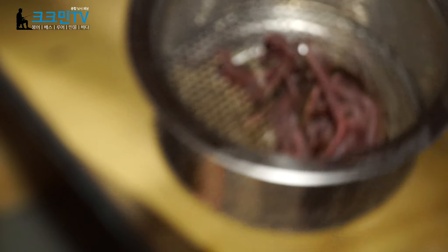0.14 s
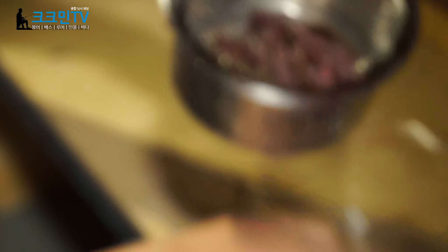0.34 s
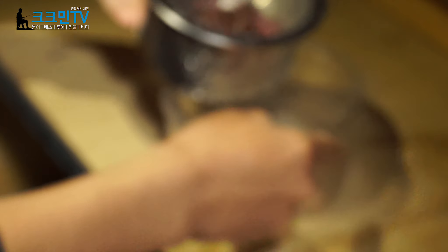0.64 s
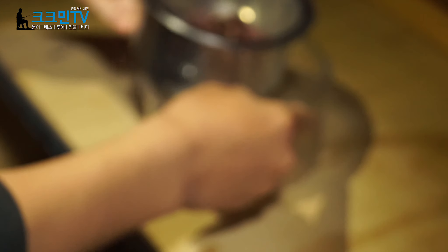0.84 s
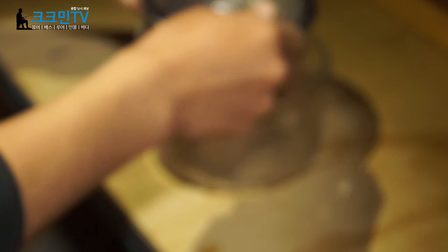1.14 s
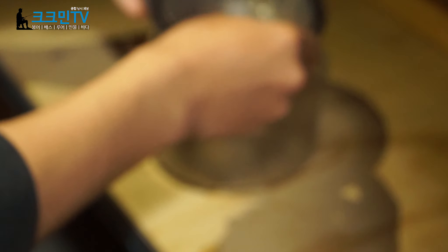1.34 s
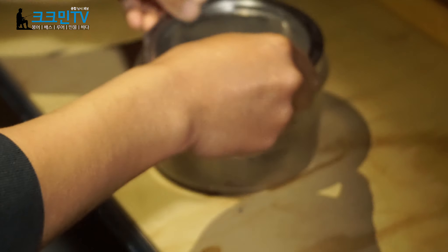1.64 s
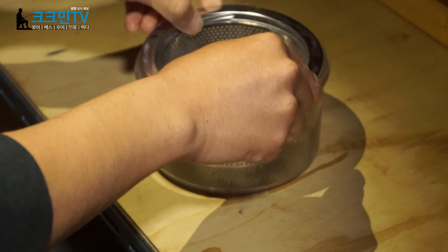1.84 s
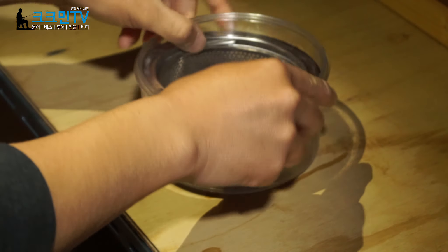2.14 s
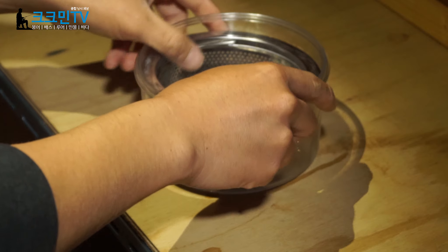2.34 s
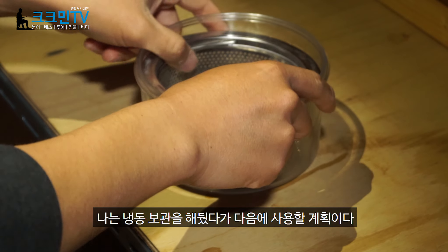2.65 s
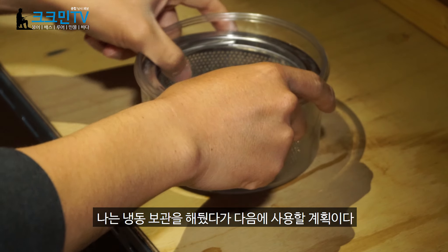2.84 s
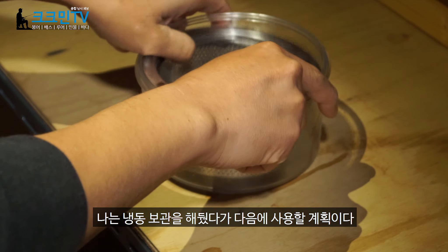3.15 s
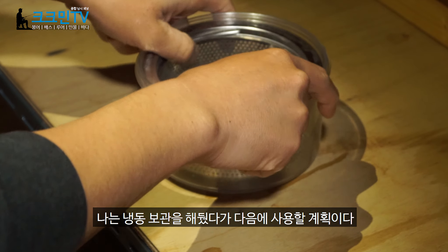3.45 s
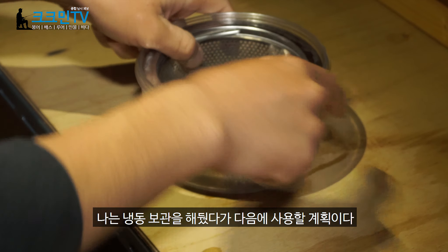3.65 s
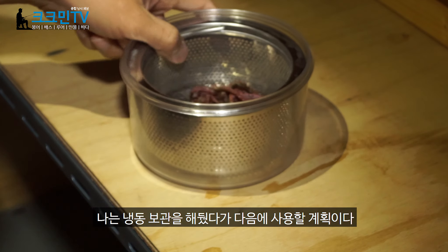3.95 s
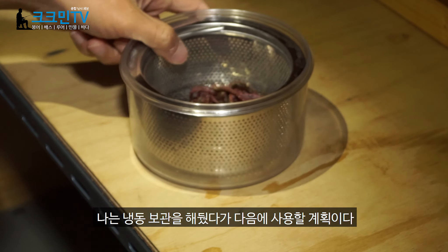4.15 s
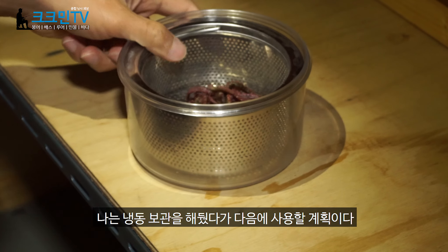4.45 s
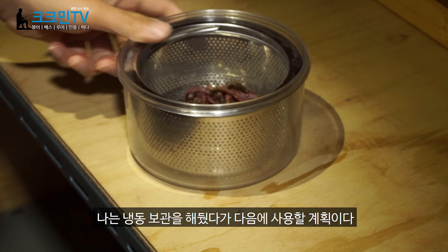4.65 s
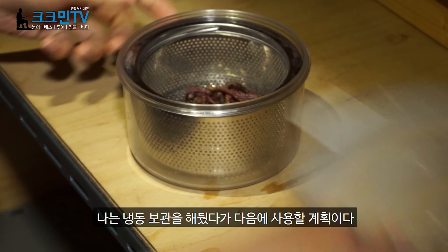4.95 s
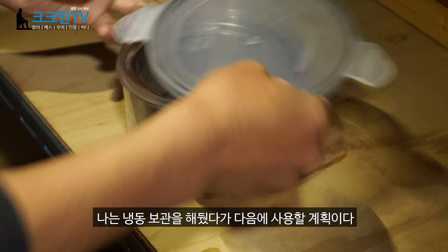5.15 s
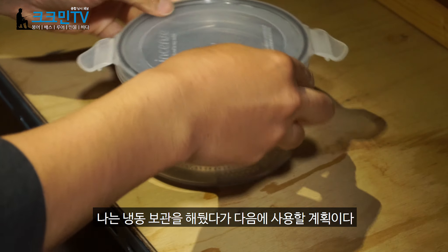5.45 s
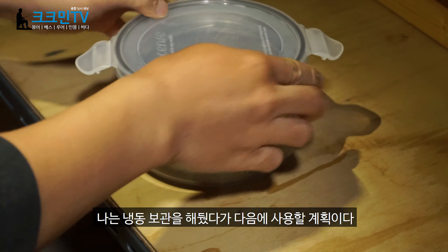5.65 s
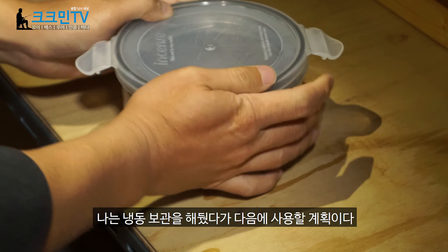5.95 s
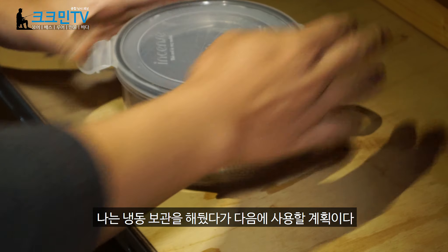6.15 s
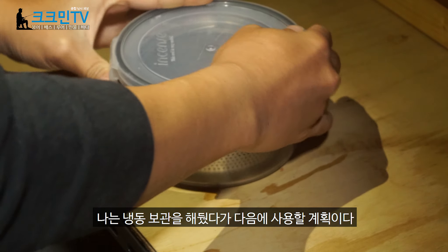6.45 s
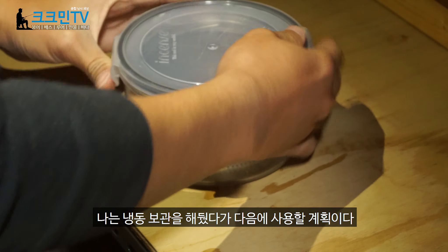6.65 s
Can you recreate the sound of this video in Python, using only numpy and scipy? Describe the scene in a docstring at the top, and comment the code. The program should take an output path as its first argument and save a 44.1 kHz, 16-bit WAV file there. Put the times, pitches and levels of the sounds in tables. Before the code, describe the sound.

Close, dry-ish handling sounds on a wooden tabletop indoors: hollow plastic knocks, short metallic mesh clatter, gritty sliding. The basket seats with the loudest early clack, then there is almost nothing but rumble and faint air. Activity resumes with rattling and dragging, a cluster of lid knocks, separate woody thumps, and finally a crisp pair of clip snaps before it settles.

```python
"""In a small rumbling room, a steel strainer basket is knocked, slid and seated into a plastic food tub
on a wooden table; a lid is picked up, laid on and its clips are snapped shut.
Knocks are short chatters of noise that ring the modes of table, tub, basket shell, rim and clips.
Slides are clumped clicks of stick-slip driving the same modes. Shaped noise makes rumble and air,
and a decaying noise tail makes the room answer."""
import sys
import numpy as np
from scipy import signal
from scipy.fft import rfft, irfft, next_fast_len
from scipy.io import wavfile
from scipy.ndimage import uniform_filter1d

SR = 44100
rng = np.random.default_rng(int(sys.argv[2]) if len(sys.argv) > 2 else 0)


def waveform_to_disk(signal):
    """Save audio, clipped to [-1, 1], as 16-bit WAV at the path in sys.argv[1]."""
    frames = np.transpose(np.atleast_2d(signal))
    scaled = np.clip(frames, -1, 1) * 32767
    samples = np.round(scaled).astype(np.int16)
    wavfile.write(sys.argv[1], SR, samples)


N = 300276

# Resonances of the wooden table top. Each row: frequency in Hz, level in dB, t60 in seconds.
TABLE_MODES = [(77.8, -24, 0.12), (99.97, -6.5, 0.75), (126, -1.5, 0.33), (144.7, -7, .3),
               (198.8, -2, 0.26), (241.2, -9, 0.19)]
# Resonances of the plastic tub wall. Each row: frequency in Hz, level in dB, t60 in seconds.
TUB_MODES = [(317.8, -5, 0.11), (330, 3, 0.071), (384, 3, 0.046), (443, -2.5, 0.033), (501.7, -2, 0.081),
             (559.3, -7.5, 0.19), (621, -6.5, 0.063), (714, -9.5, 0.073), (770.7, -5, 0.074)]
# Resonances of the basket shell. Each row: frequency in Hz, level in dB, t60 in seconds.
SHELL_MODES = [(979, -16.5, 0.015), (1127, -1, 0.016), (1270, -11.5, 0.048), (1402, -9.5, 0.016),
               (1668, -4, 0.017), (1805, -9.5, 0.016), (2045, -5.5, 0.016)]
# Resonances of the rim. Each row: frequency in Hz, level in dB, t60 in seconds.
RIM_MODES = [(2297, 0, 0.01), (2650, -3, 0.015), (2893, -4.5, 0.022), (3136, -6, 0.014),
             (3636, -4.5, 0.028), (3660, 0.5, 0.0074), (4060, 0.5, 0.0085), (4326, -5, 0.011),
             (4410, -18.5, 0.034)]
# Brightest resonances, of lid and clips. Each row: frequency in Hz, level in dB, t60 in seconds.
SNAP_MODES = [(4730, 2.5, 0.0084), (5180, -1, 0.011), (5465, -2, 0.014), (6120, -6.5, 0.022),
              (6290, -11, 0.018), (6470, -13, 0.023)]


def from_db(db):
    """Gain of a level in dB."""
    return 10 ** (np.asarray(db) / 20)


def rms_one(x):
    """Scale to unit rms."""
    return x / np.sqrt(np.mean(x ** 2) + 1e-20)


def drift(rate_hz):
    """Slow random wander of rms 1: noise through two equal low-pass poles at rate_hz."""
    step = 40   # samples between the points of the slow curve
    settle = 2000   # points dropped while the filter settles
    pole = np.exp(-2 * np.pi * rate_hz * step / SR)
    noise = rng.standard_normal(N // step + settle + 2)
    slow = signal.lfilter([1], [1, -2 * pole, pole * pole], noise)[settle:]
    return np.interp(np.arange(N) / step, np.arange(len(slow)), rms_one(slow))


def coloured_noise(spectrum, lumpy_db):
    """Noise of a given spectrum whose level wavers; rms 1 with the wavering included."""
    hz, level_db = np.transpose(spectrum)
    size = next_fast_len(N)
    bin_hz = np.fft.rfftfreq(size, 1 / SR)
    shape = from_db(np.interp(np.log(bin_hz + 1), np.log(hz), level_db))
    noise = irfft(rfft(rng.standard_normal(size)) * shape, size)[:N]
    return rms_one(noise * from_db(lumpy_db * drift(9.8)))


def room_rumble():
    """Low noise of the room that grows to a steady level."""
    # Colour of the rumble. Each row: frequency in Hz, relative level in dB per Hz.
    rumble_colour = [(12, -37), (20, 8), (125, -2.5), (166, -13.5), (206, -9), (242, -29.5), (264, -55),
                     (323, -18.5), (400, -30), (520, -26), (880, -120)]
    start_db, steady_db, rise_s = -46, -28, 1.37
    level_db = np.interp(np.arange(N) / SR, [0, rise_s], [start_db, steady_db])
    return from_db(level_db) * coloured_noise(rumble_colour, lumpy_db=0.86)


def room_air():
    """Faint, nearly steady broadband noise of the air."""
    # Colour of the air. Each row: frequency in Hz, relative level in dB per Hz.
    air_colour = [(100, -13.5), (170, 1), (262, -6.5), (342, -9.5), (1100, -24.5), (1410, -30.5),
                  (1800, -28.5), (2180, -35), (4370, -38), (7850, -44), (9850, -42.5), (13300, -53.5),
                  (15500, -60)]
    air_db = -39
    return from_db(air_db) * coloured_noise(air_colour, lumpy_db=0.15)


def room_tail(x):
    """Diffuse reverberation: noise that dies away at its own rate in each band."""
    # Decay of the room. Each row: band centre in Hz, t60 in seconds.
    decay_bands = [(200, 0.34), (800, 0.23), (3000, 0.21), (8000, 0.1)]
    level_db = -9
    t = np.arange(SR // 2) / SR
    tail = 0
    for hz, t60 in decay_bands:
        band = signal.butter(2, [hz / 2, hz * 2], "band", fs=SR, output="sos")
        decay = np.exp(-np.log(1000) * t / t60)
        tail = tail + signal.sosfilt(band, rng.standard_normal(len(t))) * decay
    tail *= np.clip(t / 0.0063, 0, 1)   # the first walls answer over a few milliseconds
    tail /= np.sqrt(np.sum(tail ** 2))
    return from_db(level_db) * signal.fftconvolve(x, tail)[:N]


def ring(force, hz, t60):
    """One resonance: a unit click sets a decaying sine of height 1 ringing."""
    radius = np.exp(-np.log(1000) / (t60 * SR))
    w = 2 * np.pi * hz / SR
    poles = [1, -2 * radius * np.cos(w), radius * radius]
    return signal.lfilter([0, np.sin(w)], poles, force + 1e-18)   # tiny offset avoids denormals


def clatter(force, low_hz, high_hz):
    """The many modes of the mesh and edges, too dense to tell apart: a broad band."""
    band = signal.butter(3, [low_hz, high_hz], "band", fs=SR, output="sos")
    return signal.sosfilt(band, force)


def slips(per_s, clumped_db):
    """Stick-slip: uneven clicks that come in clumps."""
    chance = per_s * from_db(clumped_db * drift(40)) / SR
    return (rng.random(N) < chance) * rng.standard_normal(N)


def rubbed(modes, per_s, t60_factor, wander_db):
    """Slips drive the modes; as the contact point moves, the modes swell in turn; rms 1."""
    force = slips(per_s, clumped_db=4.0)
    out = 0
    for k, (hz, db, t60) in enumerate(modes):
        moving_force = force * from_db(wander_db * drift(5.3))
        sign = (-1) ** k
        out = out + sign * from_db(db) * ring(moving_force, hz, t60 * t60_factor)
    return rms_one(out)


def stroke(column):
    """Gain of the sliding contact over time: rise, hold and fall, silent between strokes."""
    # Strokes of sliding contact. Each row: start, rise, hold and fall in seconds,
    # then peak level in dB of tub wall, shell and rim.
    strokes = [(0.0, 0.11, 0.055, .03, -46, -55.5, -61), (0.771, 0.02, .01, 0.27, -23.5, -40, -40.5),
               (1.112, 0.028, 0.31, 0.075, -48.5, -62, -62), (2.051, 0.049, .03, .005, -22.5, -31, -34),
               (2.763, 0.018, 0.034, 0.23, -51, -72, -61.5), (3.133, 0.038, 0.1, .03, -44, -54.5, -48.5),
               (3.276, 0.12, 0.0088, 0.04, -45.5, -53, -48),
               (3.72, 0.076, .105, 0.069, -38.5, -46.5, -52.5), (4.143, .01, 0.051, .06, -29, -32, -41),
               (4.148, 0.093, 0.069, 0.13, -25, -32, -38), (4.468, .022, 0.018, 0.29, -34, -43, -47),
               (4.562, 0.02, 0.053, 0.22, -30.5, -37.5, -45), (5.266, 0.019, .003, .004, -23.5, -31.5, -36),
               (5.495, 0.026, 0.025, 0.029, -31.5, -39, -46), (6.046, 0.049, 0.036, 0.1, -60, -55, -64),
               (6.22, 0.12, 0.027, 0.023, -39, -49, -50), (6.701, 0.04, .015, 0.068, -48, -49, -54.5)]
    range_db = 22.5   # a stroke rises and falls by this much
    t, gain = np.arange(N) / SR, np.zeros(N)
    for row in strokes:
        corners_s = np.cumsum(row[:4])
        shape_db = np.interp(t, corners_s, [-range_db, 0, 0, -range_db], left=-200, right=-200)
        gain = np.maximum(gain, from_db(row[column] + shape_db))
    return uniform_filter1d(gain, size=300)   # rounds the corners over about 7 ms


def slides():
    """Basket, tub and lid rub on each other and on the table; returns body sound and bright spray."""
    t = np.arange(N) / SR
    lid_dragged = (t > 4.1) & (t < 4.58)   # the lid is dragged over the table
    lid_modes = [(742, 0, .04)]   # Hz, dB, t60 in seconds
    wall = rubbed(TUB_MODES, per_s=600, t60_factor=1.0, wander_db=5.5) * np.where(lid_dragged, .6, 1)
    wall += 0.75 * lid_dragged * rubbed(lid_modes, per_s=1800, t60_factor=0.94, wander_db=2.0)
    # the table top is dragged along
    table = 0.68 * rubbed(TABLE_MODES, per_s=330, t60_factor=0.48, wander_db=2.5)
    shell = rubbed(SHELL_MODES, per_s=900, t60_factor=1.04, wander_db=4.0)
    bright = rubbed(RIM_MODES, per_s=2800, t60_factor=1.0, wander_db=3.0)
    bright += 0.73 * rms_one(clatter(slips(per_s=1700, clumped_db=8.5), low_hz=1990, high_hz=5260))
    bright += 0.26 * rubbed(SNAP_MODES, per_s=1800, t60_factor=0.39, wander_db=3.5)
    spray = 0.11 * rms_one(clatter(slips(per_s=6100, clumped_db=11.0), low_hz=6100, high_hz=9460))
    bright_stroke = stroke(column=6)
    bodies = stroke(column=4) * (wall + table) + stroke(column=5) * shell + bright_stroke * bright
    return bodies, bright_stroke * spray


def blows(events, level_db, stretch, hz):
    """Each blow is a short chatter of contacts that swells and dies; level_db sets its strength near hz."""
    length = 1500   # samples
    out, t = np.zeros(N + length), np.arange(length) / SR
    probe = np.exp(2j * np.pi * hz * t)
    for (start_s, contact_ms), gain in zip(events, from_db(level_db)):
        chatter = rng.standard_normal(length) * from_db(5 * rng.standard_normal(length))
        decay_ms = np.clip(contact_ms * stretch, .3, 9)
        chatter *= np.exp(-t * 1000 / decay_ms)
        chatter *= 1 - np.exp(-t / 0.0052)
        # mostly the energy at hz, partly the energy of the whole chatter
        strength = np.sqrt(.7 * abs(chatter @ probe) ** 2 + .3 * chatter @ chatter)
        start = round(start_s * SR)
        out[start:start + length] += gain * chatter / strength
    return out[:N]


def struck(modes, events, level_db, centre_hz, db_per_octave, stretch):
    """The spot that is hit favours the modes near its centre; each mode takes a slightly other share."""
    out = 0
    for hz, db, t60 in modes:
        off_centre_db = db_per_octave * abs(np.log2(hz / centre_hz))
        share_db = db - off_centre_db + 0.23 * rng.standard_normal(len(events))
        out = out + ring(blows(events, level_db + share_db, stretch, hz), hz, t60)
    return out


def knocks():
    """Blows ring table, tub, shell, rim and clips; returns table thuds, bodies and bare edges."""
    # Knocks and ticks. Each row: start in seconds, level in dB of table, tub wall, shell, rim and top,
    # contact time in ms before each part's stretch and limits, shell centre in Hz.
    knock_rows = [(0.027, -60, -62, -31.5, -58, -70, 5.1, 950),
                  (0.1824, -30, -30.5, -43, -66, -67, 4.5, 1090),
                  (0.2762, -25.5, -46, -42, -62, -67, 3.2, 910),
                  (0.559, -57, -68, -35.5, -44, -68, 7.9, 1240),
                  (0.711, -45, -23.5, -17.5, -31, -43, 5.2, 1180),
                  (0.7776, -22, -20.5, -14, -31, -53, 17, 1090),
                  (0.815, -10.5, -18.5, -19, -41, -53, 5.2, 1240),
                  (1.0927, -23.5, -33.5, -32, -35.5, -57, 2.1, 1010),
                  (1.215, -60, -60, -56, -54, -49, 4.4, 912), (1.285, -57, -53, -38, -39, -64, 19, 1710),
                  (1.456, -14.5, -27, -39, -33, -59, 8.5, 1290),
                  (1.485, -20, -22.5, -60, -37.5, -59, 4.3, 931),
                  (1.6915, -66, -60, -28.5, -30.5, -59, 7.4, 990),
                  (1.748, -20, -39, -28.5, -32.5, -50, 17, 1060), (1.8299, -9, -9, -10, -19, -34, 8.7, 920),
                  (1.9522, -15, -19, -24, -28, -47, 18, 1160), (2.0165, -20, -36, -44, -38, -56, 21, 902),
                  (2.0841, -9.5, -22, -36, -19, -38, 13, 1140),
                  (2.0975, -35, -23, -26, -30, -34, 2.6, 1700), (2.115, -44, -28, -25, -26, -30, 4.6, 2000),
                  (2.1249, -0.5, -8.5, -4.5, -8.5, -23, 3, 1250),
                  (3.0975, -60, -60, -33.5, -36.5, -46.5, 6.2, 1600),
                  (3.1578, -60, -35, -44, -38, -49, 4.7, 1150),
                  (3.4182, -60, -62, -29.5, -38, -44.5, 6.5, 1820),
                  (4.0825, -16, -22.5, -15.5, -13, -52, 4.7, 1240),
                  (4.143, -36, -24, -10.5, -20, -24, 5.9, 1340),
                  (4.1958, -38, -43, -42, -43, -49, 4.6, 1280), (4.257, -44, -41, -21, -23, -36, 5, 1280),
                  (4.296, -44, -24.5, -31, -33, -50, 1.7, 1300),
                  (4.487, -19.5, -39, -25.5, -30, -56, 24, 1270),
                  (4.5992, -14, -20.5, -31, -24, -33, 3.5, 2010),
                  (4.645, -20, -23, -12.5, -12.5, -28, 5.8, 2100),
                  (5.1326, -63, -57, -33, -41.5, -56, 5.6, 1640),
                  (5.2893, -12.5, -16, -12, -8, -23, 7, 1130),
                  (5.3384, -16, -16, -10.5, -9, -24, 1.35, 2300),
                  (5.3837, -11.5, -12, -4, -37, -35, 2.1, 1030),
                  (5.3974, -7, -20, -11, -20, -40, 3.1, 1200),
                  (5.456, -6.5, -15, -12.5, -22, -36.5, 3.3, 930),
                  (5.554, -39, -27.5, -39, -51, -50, 4.5, 950),
                  (5.5698, -6.5, -28.5, -44, -56, -50, 2.8, 1130),
                  (5.596, -32, -39, -46, -57, -56, 5.8, 1100), (5.708, -54, -54, -31, -37, -53, 3.1, 1610),
                  (5.8154, -17, -29, -14.5, -27, -30, 2.2, 1540),
                  (5.8625, -4.5, -18, -6, -10, -17.5, 5, 1040), (5.897, -16, -26, -34, -31, -45, 8.1, 1100),
                  (6.231, -26, -32.5, -50, -56, -51, 3.9, 1090),
                  (6.3525, -11.5, -29, -15, -20, -28, 5.7, 1640),
                  (6.442, -4.5, -14, -3, -5.5, -14, 2.08, 1480),
                  (6.4972, -7, -18.5, -5, -10.5, -14.5, 1.84, 1360),
                  (6.7345, -60, -57, -27, -57, -46, 15, 1115)]
    # What is handled favours its own modes: tub set down, basket lowered, basket seated, lid fetched,
    # lid laid on, clips. Each row: start in seconds, table, tub and rim centre in Hz,
    # level of the bare edges over the top in dB.
    stages = [(0, 197, 326, 2450, 12), (1.0, 180, 394, 3050, 19), (1.8, 184, 337, 3120, 18),
              (3.6, 112, 352, 3050, 12), (5.2, 114, 343, 2890, 9.5), (5.76, 105, 410, 2830, 10.5),
              (6.4, 114, 356, 4400, 1.5)]
    start_s, table_db, tub_db, shell_db, rim_db, top_db, contact_ms, shell_hz = np.transpose(knock_rows)
    events = np.transpose([start_s, contact_ms])
    stage_s, *settings = np.transpose(stages)
    stage = np.searchsorted(stage_s, start_s) - 1
    table_hz, tub_hz, rim_hz, edge_over_top_db = np.array(settings)[:, stage]

    thuds = struck(TABLE_MODES, events, table_db, table_hz, db_per_octave=8.0, stretch=0.63)
    bodies = struck(TUB_MODES, events, tub_db, tub_hz, db_per_octave=2.5, stretch=0.66)
    bodies += struck(SHELL_MODES, events, shell_db, shell_hz, db_per_octave=12.5, stretch=1.0)
    bodies += struck(RIM_MODES, events, rim_db, rim_hz, db_per_octave=15.5, stretch=0.34)
    bodies += struck(SNAP_MODES, events, top_db, centre_hz=4910, db_per_octave=8.0, stretch=1.56)
    mesh_force = blows(events, rim_db + 14.0, stretch=4.8, hz=3090)
    bodies += clatter(mesh_force, low_hz=1950, high_hz=4680)

    edge_db = top_db + edge_over_top_db
    edges = clatter(blows(events, edge_db, stretch=3.1, hz=8930), low_hz=6040, high_hz=9440)
    very_top_force = blows(events, edge_db - 15.5, stretch=0.83, hz=12000)
    edges += clatter(very_top_force, low_hz=9500, high_hz=15000)
    return thuds, bodies, edges


def darkened(x):
    """A steep low-pass at 6800 Hz keeps the ringing bodies dull on top."""
    return signal.sosfilt(signal.butter(4, 6800, fs=SR, output="sos"), x)


def scene():
    """Knocks and slides in the room, over rumble and air."""
    background = room_rumble() + room_air()
    rubbing, spray = slides()
    thuds, bodies, edges = knocks()
    # only the bare edges and the spray reach above the low-pass
    near = darkened(bodies + rubbing) + edges + spray
    return (thuds + near + room_tail(near) + background)[None]


def record(dry):
    """Peaks are rounded, the top is cut."""
    rounded = 1.1 * np.tanh(dry / 1.1)
    top_cut = signal.cheby2(12, 70, 15800, fs=SR, output="sos")   # 70 dB down from 15800 Hz up
    return signal.sosfilt(top_cut, rounded)


dry = scene()
out = record(dry)
waveform_to_disk(out)
```